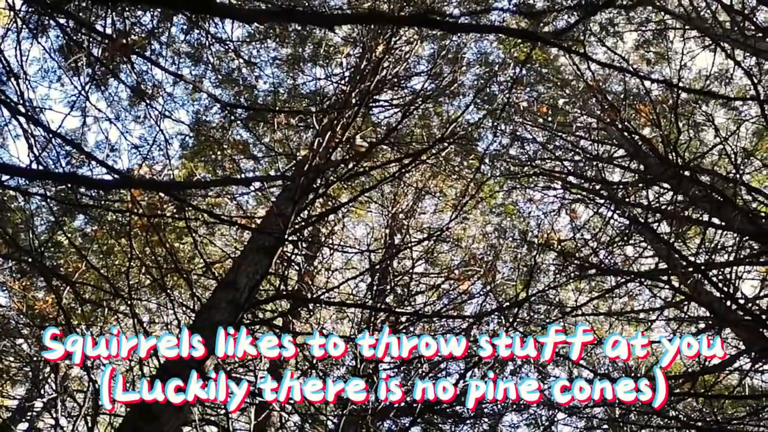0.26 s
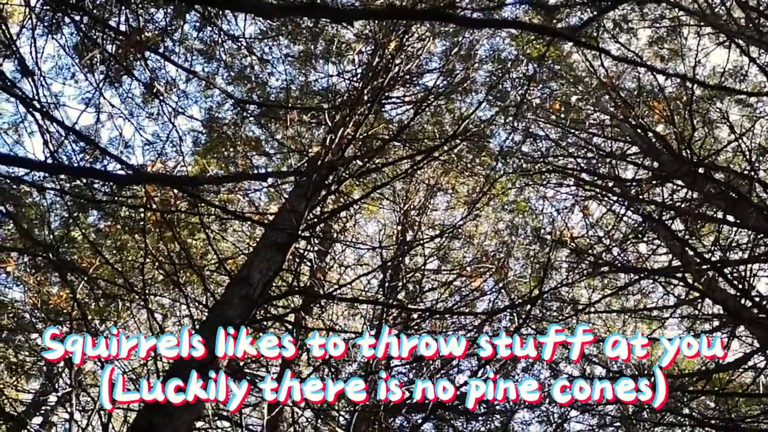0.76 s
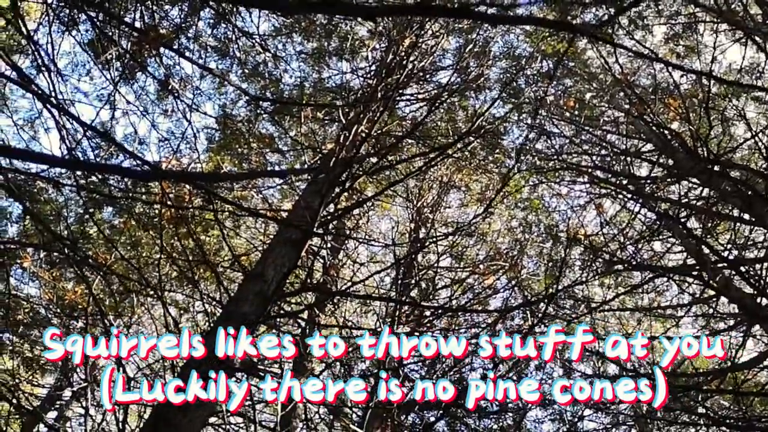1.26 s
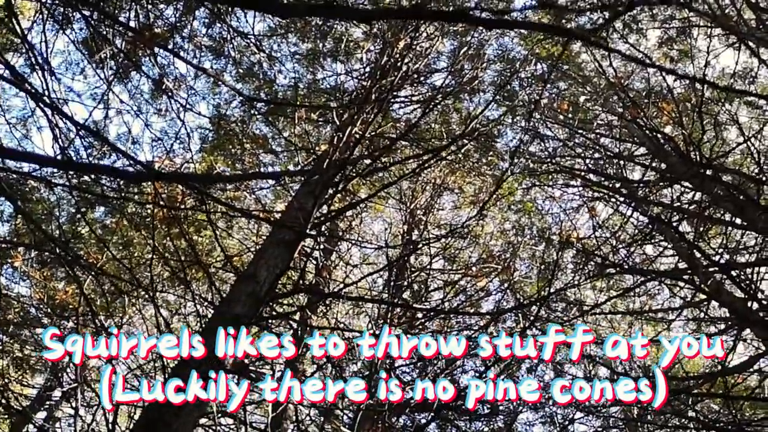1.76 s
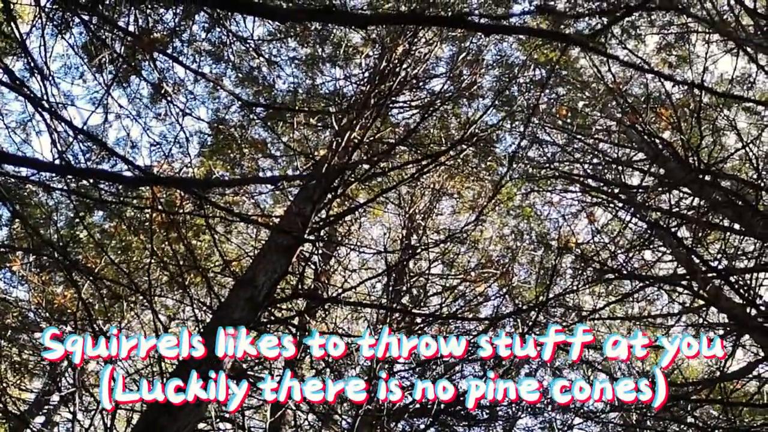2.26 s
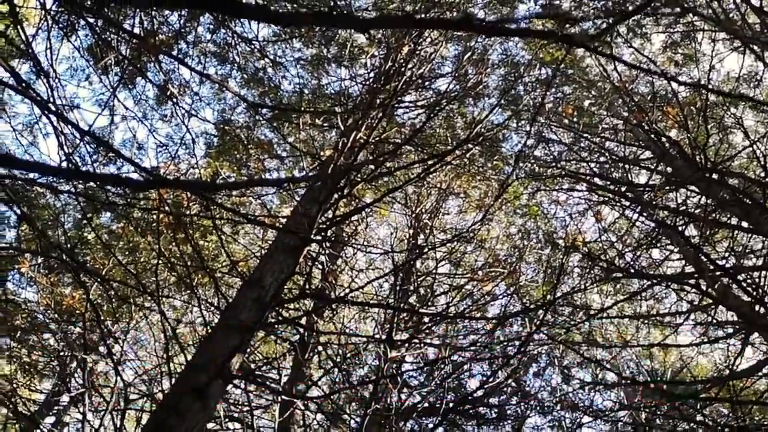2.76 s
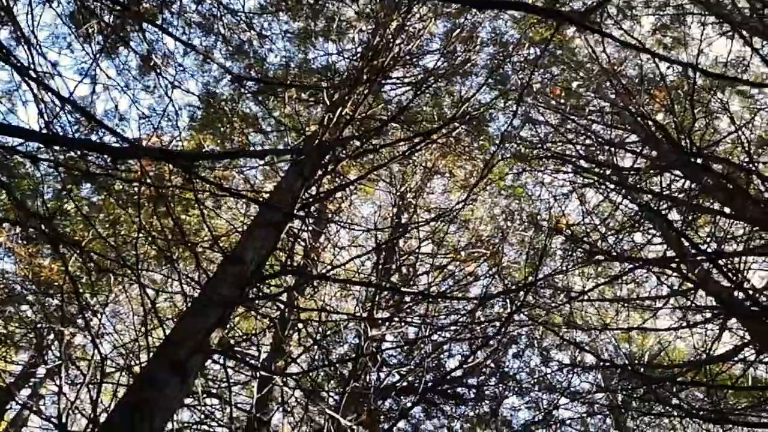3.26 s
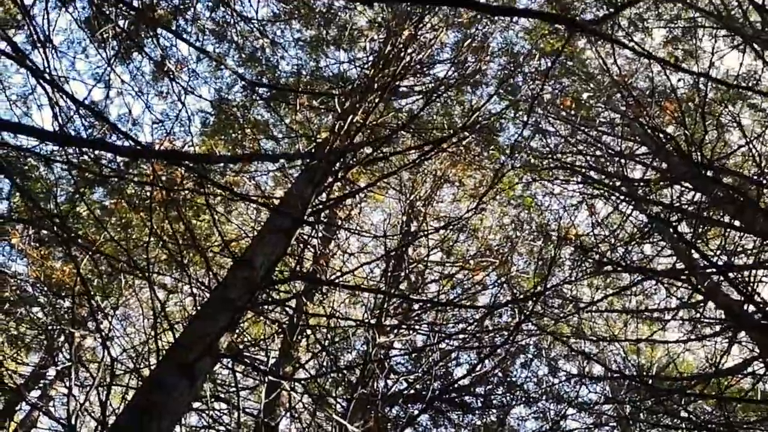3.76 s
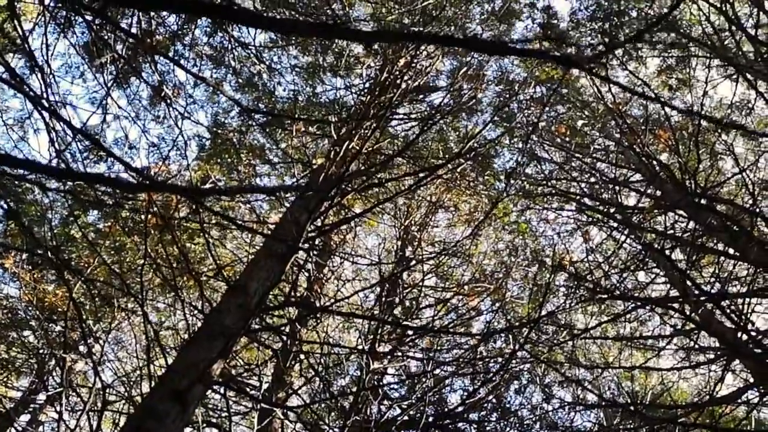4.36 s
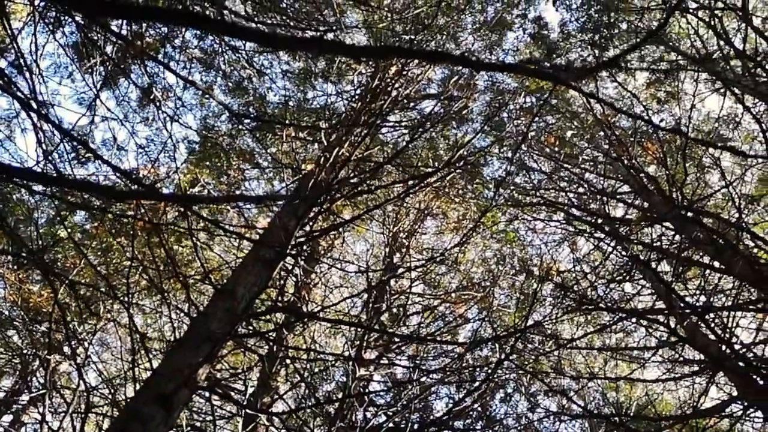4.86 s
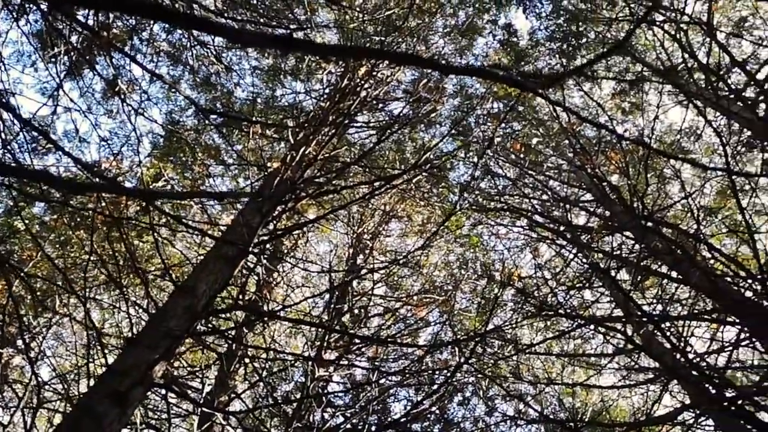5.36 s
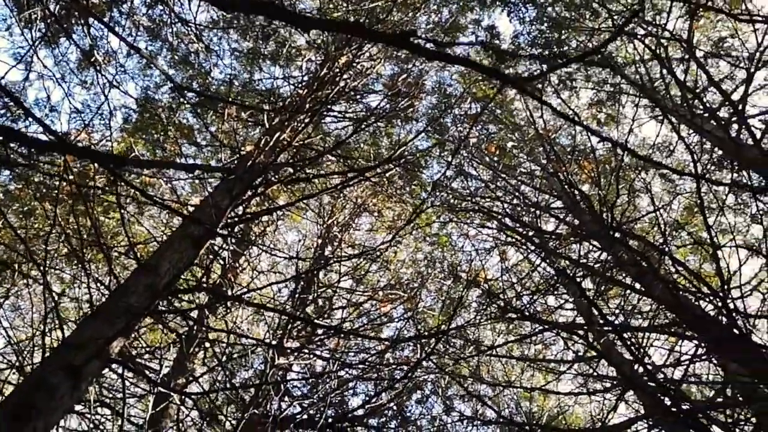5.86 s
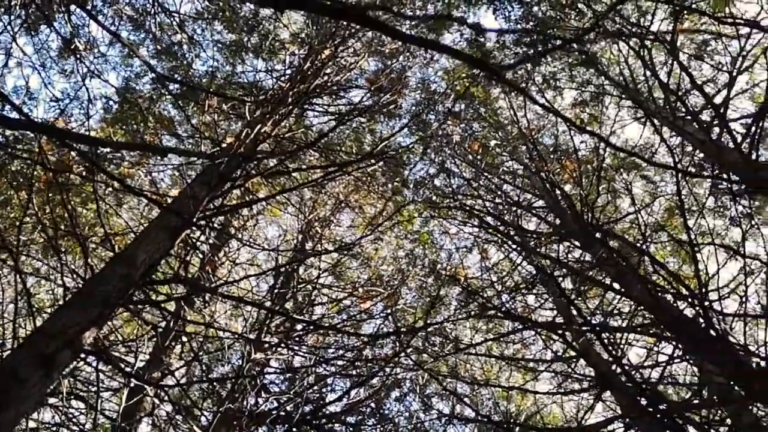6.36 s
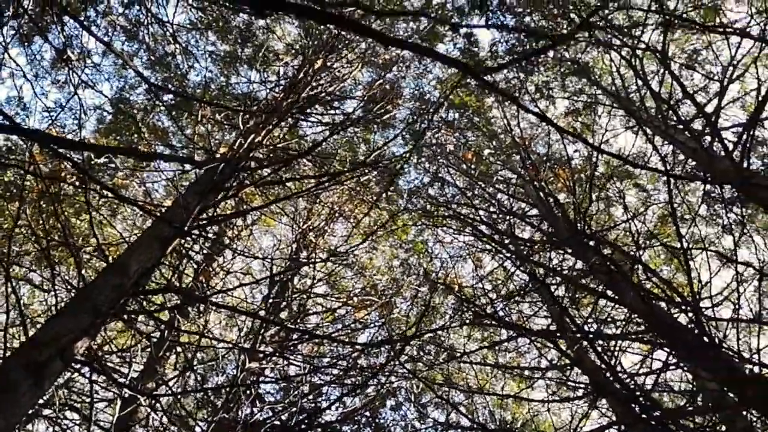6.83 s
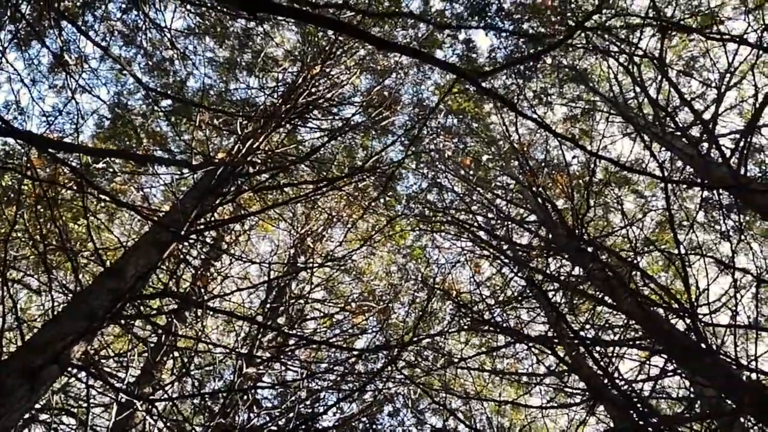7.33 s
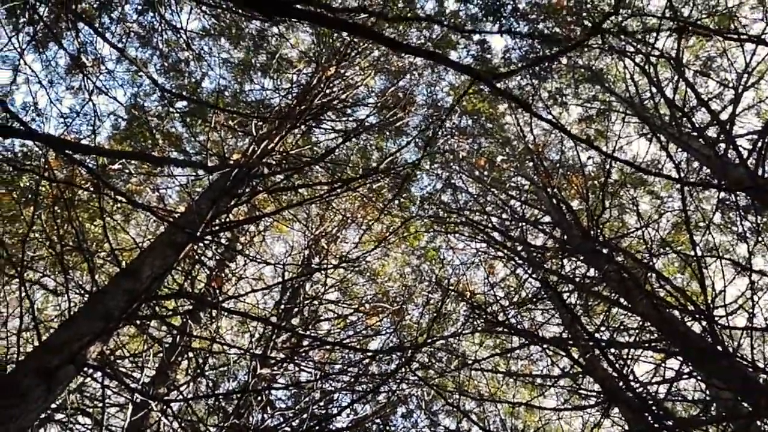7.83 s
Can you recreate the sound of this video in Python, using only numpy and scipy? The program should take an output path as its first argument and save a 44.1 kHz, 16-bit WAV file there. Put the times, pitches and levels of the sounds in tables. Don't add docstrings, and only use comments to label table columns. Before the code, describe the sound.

A squirrel overhead squeals and chirps high and sharp, another answers faintly with echo, over soft leaf hush and deep wind rumble on the microphone.

```python
import sys
import numpy as np
from scipy import signal
from scipy.fft import rfft, irfft, next_fast_len
from scipy.io import wavfile
from scipy.ndimage import uniform_filter1d, map_coordinates

SR = 44100
rng = np.random.default_rng(int(sys.argv[2]) if len(sys.argv) > 2 else 0)


def to_wav(s):
    ch = np.atleast_2d(s).T
    pcm = np.round(np.clip(ch, -1, 1) * 32767)
    wavfile.write(sys.argv[1], SR, pcm.astype(np.int16))


def field_ratio(decibels):
    return 10 ** (np.asarray(decibels, dtype=float) / 20)


N = 356769

# (time [s], level [dB])
BREEZE = [(0.0, -52), (0.36, -50), (0.59, -50), (2.79, -50.5), (3.02, -47.5), (4.05, -50), (7.57, -49.5),
          (7.8, -52.5), (8.09, -54)]
# (frequency [Hz], level [dB per Hz])
LEAF_TONE = [(100, -4), (250, -4), (500, -6.5), (750, -1.5), (1000, 2.5), (1400, -4), (1900, -7.5),
             (2500, -14), (3500, -21.5), (5000, -29), (9000, -43)]
# (frequency [Hz], level [dB per Hz])
HISS_TONE = [(500, -41), (1500, -2), (3000, 2), (5000, 7.5), (7000, 5), (9000, 1.5), (12000, 1), (16000, 0)]
# (frequency [Hz], level [dB])
LEAF_SHADOW = [(200, 0), (380, -1), (700, -9.5), (1290, -9.5), (2400, -0.5), (4400, 0.5)]
# (frequency [Hz], likeness [0 to 1])
LIKENESS = [(200, 0.38), (700, 0.78), (1400, 0.46), (2800, 0.1), (5000, 0.1)]
# (time [s], level [dB])
WIND_LEVEL = [(0, -31), (.3, -28), (.55, -26.5), (.95, -31), (1.5, -29), (2.1, -31), (2.5, -31.5),
              (2.9, -20.5), (3.2, -19), (3.55, -25.5), (3.8, -31), (4.3, -29.5), (5.1, -26.5), (5.8, -27),
              (6.5, -25), (7.3, -27), (7.75, -30.5), (8.09, -29)]
# (time [s], level over the wind [dB])
EDDIES = [(0.041, 8), (.25, 1.5), (0.501, 8), (.64, 9.5), (.83, 5), (1.115, 7.5), (1.3, 1.5), (1.67, 1),
          (1.83, 3), (2.2, 5), (2.55, 4.5), (2.73, 7), (3.64, 1), (3.97, 4), (4.28, 5), (4.5, 1),
          (4.71, 4.5), (4.91, 4.5), (5.12, 9.5), (5.33, 9.5), (5.52, 1.5), (5.721, 8), (5.95, -0.5),
          (6.21, 6), (6.52, 5.5), (6.92, 3), (7.5, 1), (7.86, -2.5)]
# (time [s], peak [dB], slower thud [dB])
PUFFS = [(0.254, -31.5, 23), (0.765, -47, 5), (1.036, -41, 17), (1.094, -52, 25), (1.305, -40.5, 0),
         (1.625, -49, 21), (2.16, -29.5, -4), (2.826, -29.5, -1), (3.362, -64, 18), (3.498, -53, 12),
         (4.033, -32.5, 13), (4.224, -31, 0.5), (4.266, -41.5, 6), (4.367, -34, 4), (4.704, -32.5, 4),
         (4.884, -31, 8), (5.112, -29, 9), (5.234, -59, 11), (5.531, -36, 2), (6.06, -32.5, -3),
         (6.133, -35, 6), (6.43, -28.5, -8), (7.792, -40, 11)]
# (frequency [Hz], level [dB per Hz])
SWAY_TONE = [(1, -41), (3, -21.5), (7, -18.5), (11, 1), (16, -7.5), (25, -11.5), (35, -59), (80, -120)]
# (frequency [Hz], level [dB per Hz])
BUFFET_TONE = [(5, -66), (12, -10), (25, -3.5), (45, -3), (65, -5.5), (90, -14.5), (130, -24), (200, -35.5),
               (400, -51), (1500, -120)]
# (time [s], peak [dB])
TICKS = [(3.8746, -52), (4.6296, -50), (5.2215, -45), (5.4657, -43), (5.7675, -37), (5.91, -38),
         (6.3854, -60), (6.7426, -47), (6.872, -33), (7.0529, -41), (7.1612, -37)]
# (time [s], hold [s], level [dB])
SCRAPES = [
    (0.52, 0.074, -47),
    (3.866, .06, -68),
    (6.368, .022, -59.5),
    (6.741, .05, -66),
]
# (frequency [Hz], level [dB per Hz])
BARK_TONE = [(500, -60), (2000, -5), (4000, -12.5), (6500, -8), (7800, 6), (9000, -2), (10500, -22),
             (15000, -23)]
# (frequency [Hz], level [dB])
THROAT_TONE = [(2400, -23), (2800, -16.5), (3150, -58), (3500, -9), (4500, 1), (5800, 3.5), (7000, -7),
               (8500, -22), (10000, -21.5), (11500, -31.5), (13500, -27), (16000, -45)]
# (time [s], top of the second harmonic [Hz], level [dB])
FAR_CHIRPS = [(0.122, 6900, -38), (1.006, 7010, -42.5), (1.447, 6890, -44), (1.846, 6860, -41.5),
              (2.82, 7110, -37), (3.147, 6970, -38), (3.612, 6880, -40), (3.97, 6790, -46.5),
              (4.276, 6830, -43.5), (4.575, 6600, -46), (4.904, 6000, -56.5), (5.241, 6570, -49.5),
              (6.011, 6200, -59), (6.433, 6700, -43), (7.155, 6190, -52), (7.527, 6430, -49.5),
              (7.885, 6680, -48.5)]
# (time [s], length [s], top of the second harmonic [Hz], level [dB], overtones [dB])
NEAR_CHIRPS = [(.214, 0.04, 5930, -44.5, 9), (0.348, 0.027, 5500, -44.5, 7), (2.619, 0.033, 6170, -39, 0),
               (3.243, 0.051, 6200, -32, 5), (3.883, 0.047, 6060, -36, 1), (4.112, 0.046, 5750, -45, 11),
               (4.5, 0.056, 5760, -37.5, 5.5), (5.107, .059, 6590, -31, -4), (5.468, 0.046, 6265, -31, -3),
               (5.771, 0.039, 6240, -32.5, -2), (6.745, 0.057, 6690, -30, -7)]
# (time [s], length [s], second harmonic [Hz], level [dB], overtones [dB])
FLAT_PIPS = [
    (2.818, 0.039, 5490, -45.5, 12),
    (3.519, 0.024, 4950, -46, -17),
    (5.648, .018, 3420, -44, -30),
    (6.384, 0.013, 6860, -40, 2),
    (7.398, 0.017, 3530, -40, -28),
    (7.397, .021, 7040, -45.5, -12),
]
# (time [s], second harmonic [Hz], level [dB], overtones [dB])
LONG_SQUEALS = [
    [(.418, 5253, -33, 6), (.445, 5460, -23, 9), (.46, 5700, -21.5, 1), (.48, 5750, -14.5, 2),
     (.49, 5660, -20, -0.5), (.521, 5549, -15.5, 5.5), (.53, 4260, -34, -11.5)],
    [(1.771, 5450, -44, 6), (1.783, 5950, -33.5, 9), (1.802, 6600, -30, -11.5), (1.82, 6332, -35, 11),
     (1.837, 4800, -44, 13)],
    [(2.289, 5200, -50, 0), (2.305, 6200, -33, 2), (2.335, 7020, -40, -2), (2.355, 6430, -19, 8.5),
     (2.368, 5930, -24, 16), (2.378, 4900, -35, -2.5)],
]
# (frequency [Hz], width [Hz], level [dB])
OPENING = (7540, 570, 2.7)
# (frequency [Hz], level [dB per Hz])
WHINE_TONE = [(7300, -60), (7650, -9), (7810, -2), (7970, -16.5), (8300, -61)]
# (frequency [Hz], level [dB])
UPPER_LIMIT = [(15780, 0), (15830, -120)]

LAG = 26
SHADED_DB = -25
HISS_DB, HISS_GROWS = -59.5, 0.99
JOLT_S, LEAF_SHARE = 0.031, 0.34
SWAY_DB, SWAY_GROWS, SWAY_LURCH_DB = 1.5, 1.1, 3.5
SCRAPE_ATTACK_S, SCRAPE_FADE_DB_PER_S = .018, 230
EVEN_DB, SWELL_PER_DB = -42.5, 0.38
SLACK_DB, PURE_DB = 28, 85
ROOT_DB = -6
THIRD_DB, THIRD_PER_DB = -37, 1.5
FAR_S = .031


def unit(x):
    return x / np.sqrt(np.mean(x ** 2) + 1e-20)


def along(points, hz):
    f, v = np.transpose(points)
    return np.interp(np.log(hz + 1), np.log(f + 1), v)


def curves(rows, times):
    s, *columns = np.transpose(rows)
    return [np.interp(times, s, column) for column in columns]


def wobble(rate, size=N):
    points = rng.standard_normal(int(size * rate / SR) + 4)
    return map_coordinates(points, [np.arange(size) * rate / SR])


def coloured(x, spectrum):
    m = next_fast_len(N + 8192)
    gain = field_ratio(along(spectrum, np.fft.rfftfreq(m, 1 / SR)))
    return irfft(rfft(x, m) * gain, m)[..., :N]


def rumble(spectrum):
    return unit(coloured(rng.standard_normal(N), spectrum))


def rush(spectrum, patchy_db):
    z = signal.stft(rng.standard_normal(N), nperseg=512)[2]
    patches = uniform_filter1d(rng.standard_normal(z.shape), 6, 0)
    patches = unit(uniform_filter1d(patches, 14, 1))
    noise = signal.istft(z * field_ratio(patchy_db * patches), nperseg=512)[1][:N]
    return unit(coloured(noise, spectrum))


def add(track, s, x):
    track[round(s * SR):][:len(x)] += x


def among_trees(x, wet_db, t60, onset):
    t = np.arange(SR // 3) / SR
    fade = field_ratio(-60 * t / t60 + 0.47 * wobble(35.9, size=len(t)))
    tail = rng.standard_normal(len(t)) * fade * (1 - np.exp(-t / onset))
    tail *= field_ratio(wet_db) / np.linalg.norm(tail)
    tail[0] = 1
    return signal.fftconvolve(x, tail)


def jolts():
    now = np.arange(N) / SR
    return sum(db * np.exp(-((now - s) / JOLT_S) ** 2) for s, db in EDDIES)


def forest():
    leaves_db = curves(BREEZE, np.arange(N) / SR)[0] + LEAF_SHARE * jolts()
    left = rush(LEAF_TONE, patchy_db=0.67)
    other = rush(LEAF_TONE, patchy_db=1.8)
    angles = [(hz, np.arccos(np.clip(c, .01, .99))) for hz, c in LIKENESS]
    shared = coloured(np.roll(left, LAG), [(hz, 20 * np.log10(np.cos(a))) for hz, a in angles])
    own = coloured(other, [(hz, 20 * np.log10(np.sin(a))) for hz, a in angles])
    right = coloured(shared + own, LEAF_SHADOW)
    hiss = np.array([rumble(HISS_TONE), rumble(HISS_TONE)])
    hiss_db = HISS_DB + HISS_GROWS * (leaves_db - leaves_db.mean())
    return field_ratio(leaves_db + 7.0) * np.array([left, right]) + field_ratio(hiss_db) * hiss


def shaken_body(buffet_db):
    mean_db = buffet_db.mean()
    sway_db = mean_db + SWAY_DB + SWAY_GROWS * (buffet_db - mean_db) + SWAY_LURCH_DB * wobble(6)
    buffeting = unit(field_ratio(2.77 * wobble(14)) * rumble(BUFFET_TONE))
    return field_ratio(sway_db) * rumble(SWAY_TONE) + field_ratio(buffet_db) * buffeting


def wind_puffs():
    puffs, t = np.zeros(N + SR), np.arange(SR // 20) / SR

    def push(tau):
        return (1 - t / tau / 3) * (t / tau) ** 2 * np.exp(-t / tau)

    for (s, db, thud_db), sign in zip(PUFFS, rng.choice([-1, 1], len(PUFFS))):
        quick = field_ratio(db + 18) * push(0.0011)
        thud = field_ratio(db + thud_db - 19.5) * push(0.0017)
        add(puffs, s - .002, sign * (quick + thud))
    return puffs[:N]


def wind():
    buffet_db = curves(WIND_LEVEL, np.arange(N) / SR)[0] - 1.0 + jolts()
    swirl = rumble([(5, -41), (20, -15.0), (60, 7.5), (150, -11), (300, -13), (600, -11.0), (2000, -120)])
    apart = field_ratio(buffet_db - 20) * swirl
    return shaken_body(buffet_db) + wind_puffs() * field_ratio([[-1.5], [1.5]]) + apart * [[1], [-1]]


def twigs():
    track, t = np.zeros(N + SR), np.arange(200) / SR
    for s, db in TICKS:
        tick = unit(field_ratio(-60 * t / 0.000717) * rng.standard_normal(len(t)))
        add(track, s, field_ratio(db) * among_trees(tick, wet_db=-6, t60=0.09, onset=.004))
    return coloured(track[:N], BARK_TONE)


def claws():
    now, strength = np.arange(N) / SR, np.zeros(N)
    for s, hold, db in SCRAPES:
        attack = np.clip((now - s) / SCRAPE_ATTACK_S, 0, 1) ** 2
        fade_db = SCRAPE_FADE_DB_PER_S * np.clip(now - s - hold, 0, 1)
        strength += attack * field_ratio(db - fade_db)
    grains = rng.standard_normal(N) * field_ratio(1.54 * wobble(300) + 1.3 * wobble(40))
    return field_ratio(12.0) * strength * unit(coloured(grains, BARK_TONE))


def voice(hz, db, overtone_db):
    t = np.arange(len(hz)) / SR
    strain = .011 + .07 * field_ratio(db)
    root_hz = hz / 2 * (1 + strain * wobble(316, size=len(t)))
    phase = 2 * np.pi * np.cumsum(root_hz) / SR
    slack = 1 - hz / hz.max()

    def partial(k):
        flicker_db = 3.2 * wobble(237.3, size=len(t))
        level_db = db + along(THROAT_TONE, k * hz / 2) - SLACK_DB * slack + flicker_db
        return field_ratio(level_db) * np.sin(k * phase)

    rich_db = overtone_db - PURE_DB * slack + 4.6 * wobble(81, size=len(t))
    third_db = min(0, THIRD_PER_DB * (db.max() - THIRD_DB))
    overtones = field_ratio(ROOT_DB) * partial(0.99) + field_ratio(third_db) * partial(2.96) + partial(3.92)
    edges = np.clip(t / 0.0025, 0, 1) * np.clip(t[::-1] / 0.0042, 0, 1)
    return (partial(1.985) + field_ratio(rich_db) * overtones) * edges


def chirp(length, top_hz, db, overtone_db, rise, droop, fall):
    u = np.linspace(0, 1, round(length * SR))
    bend = rise * (1 - u) ** 9 + droop * u ** 2 + fall * u ** 13
    swell_db = SWELL_PER_DB * (db - EVEN_DB) * (u - .5)
    return voice(top_hz * (1 - bend), db + swell_db, overtone_db)


def far_squirrel():
    track = np.zeros(N + SR)
    for s, hz, db in FAR_CHIRPS:
        call = chirp(FAR_S, hz, db, -18, rise=.22, droop=.13, fall=.15)
        add(track, s, among_trees(call, wet_db=5, t60=.26, onset=.0025))
    return track[:N]


def near_squirrel():
    track = np.zeros(N + SR)

    def call_out(s, call):
        add(track, s, among_trees(call, wet_db=-3.5, t60=.25, onset=0.0013))

    for s, *call in NEAR_CHIRPS:
        call_out(s, chirp(*call, rise=0.151, droop=0.0744, fall=.21))
    for s, *call in FLAT_PIPS:
        call_out(s, chirp(*call, rise=.04, droop=.02, fall=.03))
    for rows in LONG_SQUEALS:
        start, end = rows[0][0], rows[-1][0]
        call_out(start, voice(*curves(rows, np.arange(start, end, 1 / SR))))
    return track[:N]


def scene():
    treetops = twigs() + claws() + far_squirrel() + near_squirrel()
    both = np.array([treetops, field_ratio(SHADED_DB) * np.roll(treetops, LAG)])
    return both + forest() + wind()


def roll_off(x):
    return signal.sosfilt(signal.butter(12, 16010, fs=SR, output="sos"), x)


def record(dry):
    hz, width, db = OPENING
    ring = signal.lfilter(*signal.iirpeak(hz, hz / width, SR), dry[0])
    left = dry[0] + (field_ratio(db) - 1) * ring + field_ratio(-69.5) * rumble(WHINE_TONE)
    mix = coloured(np.array([left, dry[1]]), UPPER_LIMIT) - .004
    return roll_off(mix)


dry = scene()
out = record(dry)
to_wav(out)
```